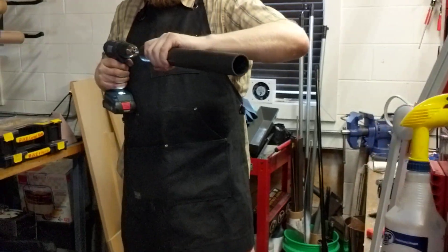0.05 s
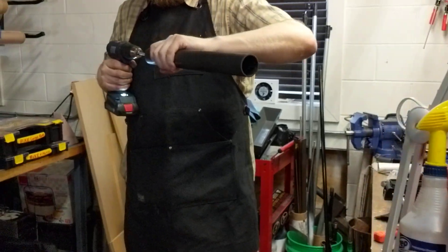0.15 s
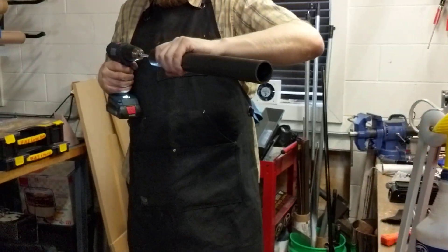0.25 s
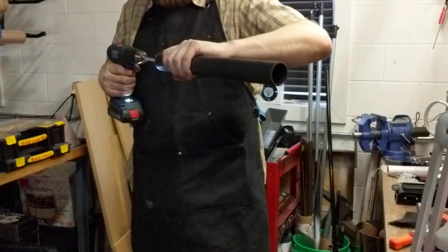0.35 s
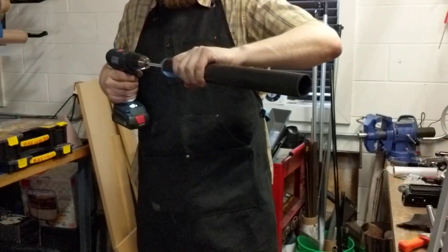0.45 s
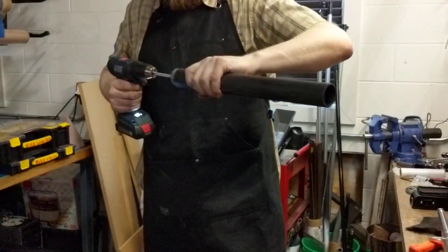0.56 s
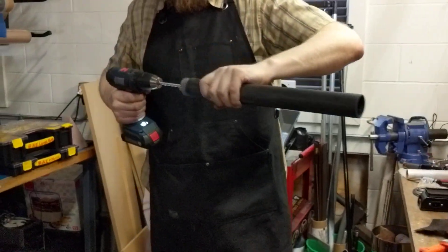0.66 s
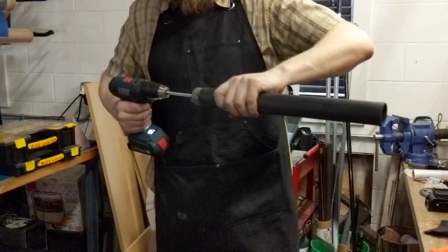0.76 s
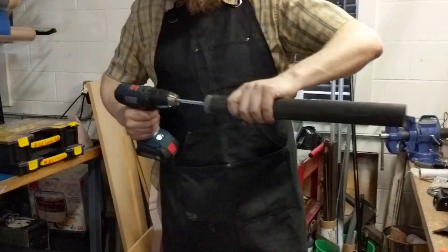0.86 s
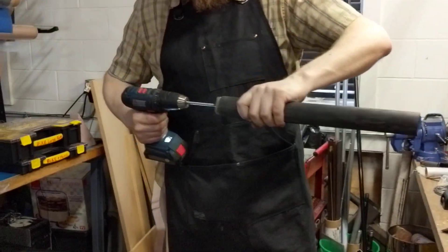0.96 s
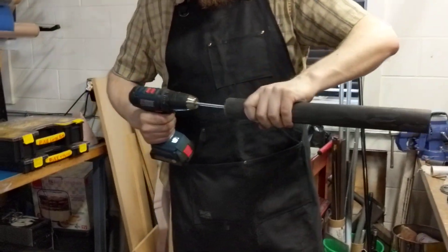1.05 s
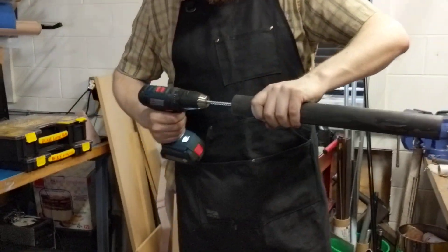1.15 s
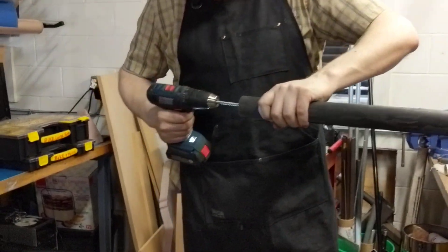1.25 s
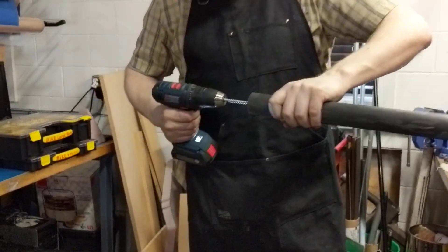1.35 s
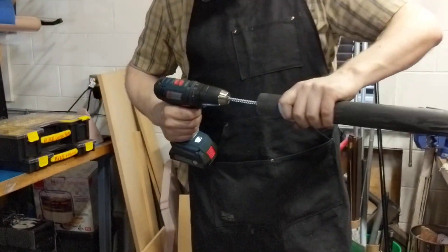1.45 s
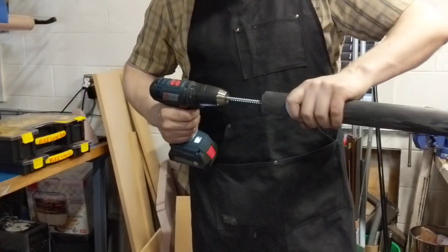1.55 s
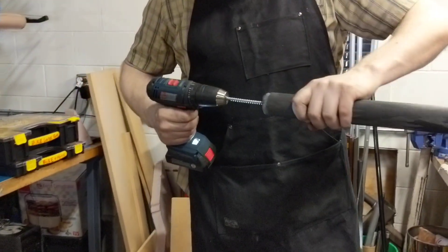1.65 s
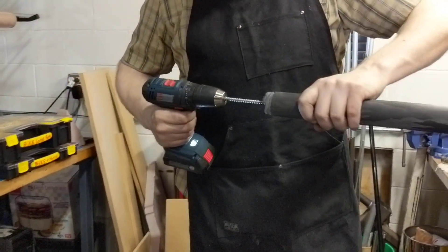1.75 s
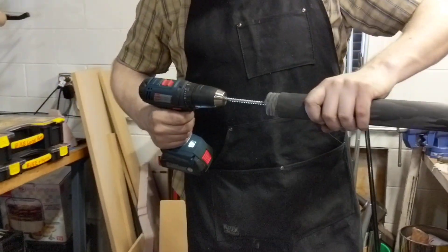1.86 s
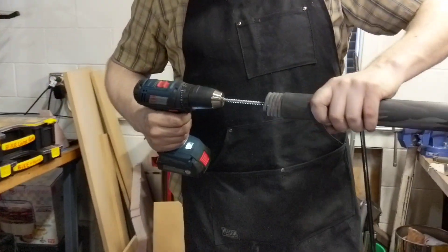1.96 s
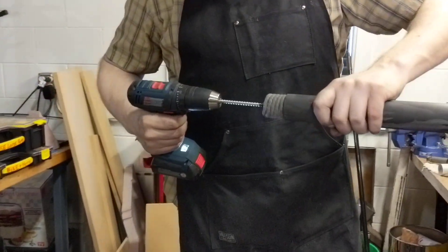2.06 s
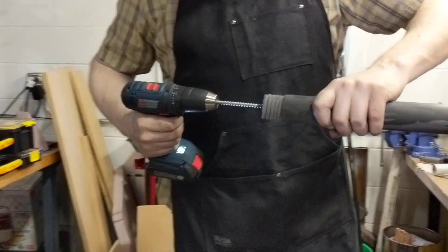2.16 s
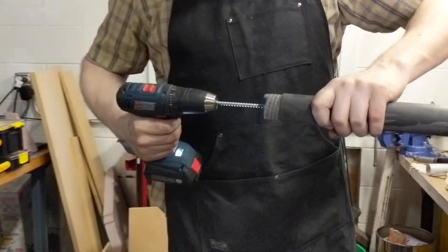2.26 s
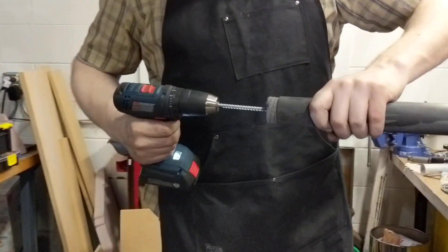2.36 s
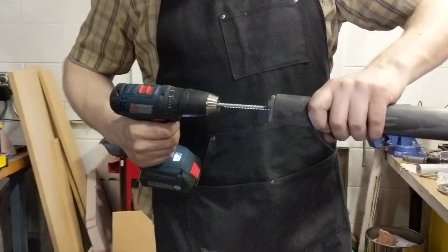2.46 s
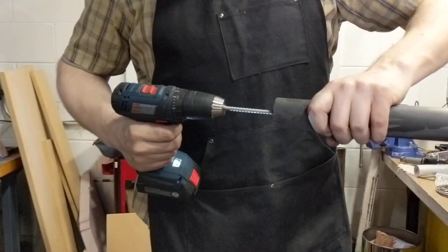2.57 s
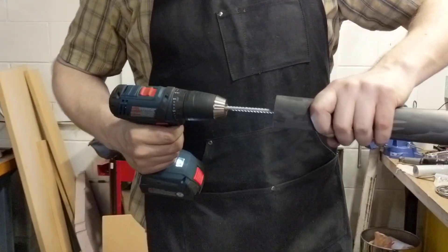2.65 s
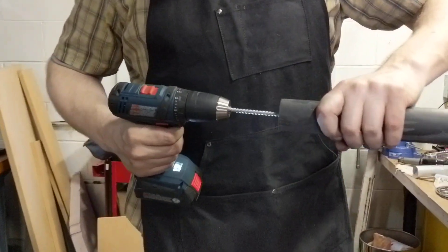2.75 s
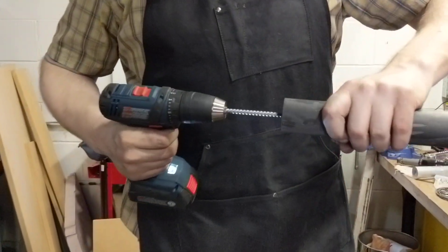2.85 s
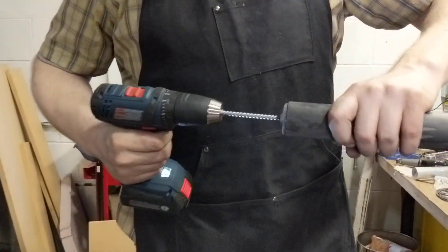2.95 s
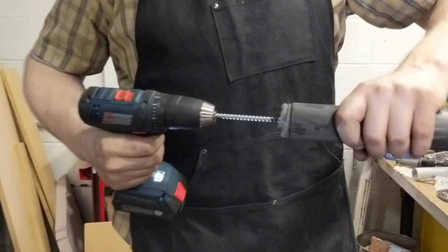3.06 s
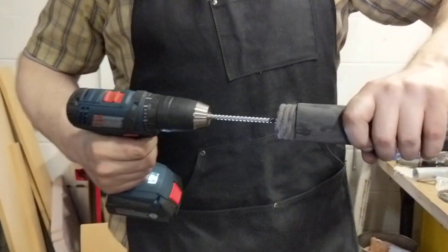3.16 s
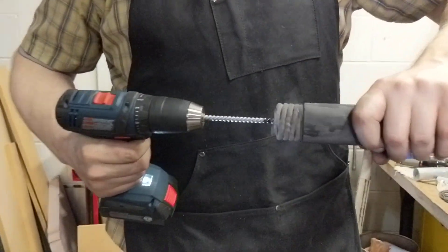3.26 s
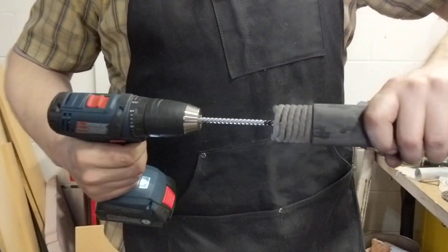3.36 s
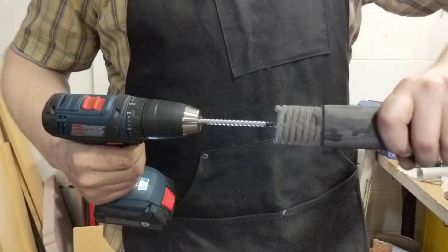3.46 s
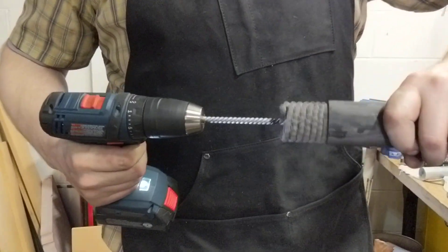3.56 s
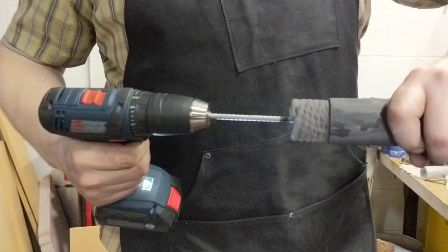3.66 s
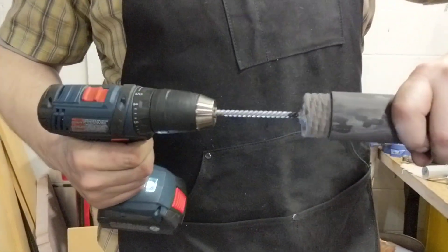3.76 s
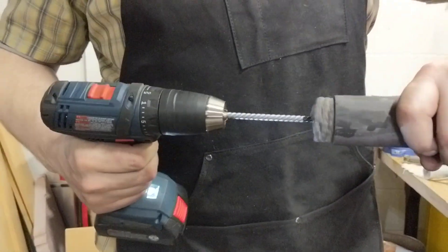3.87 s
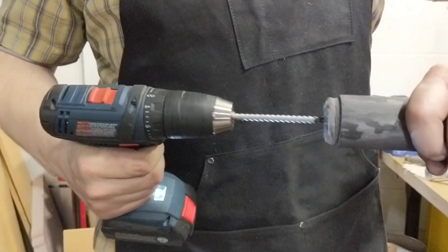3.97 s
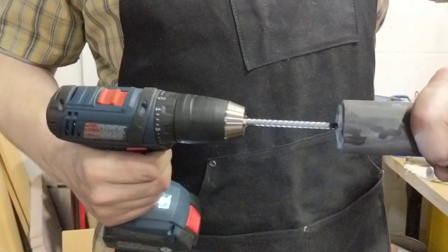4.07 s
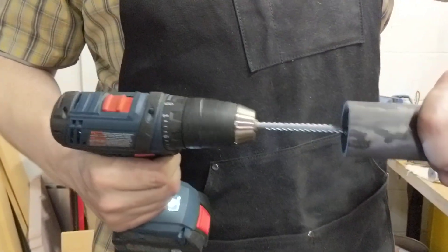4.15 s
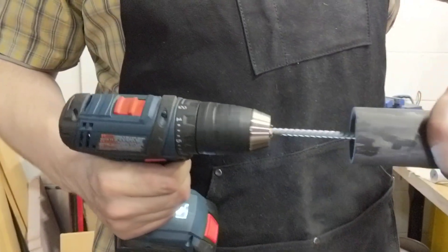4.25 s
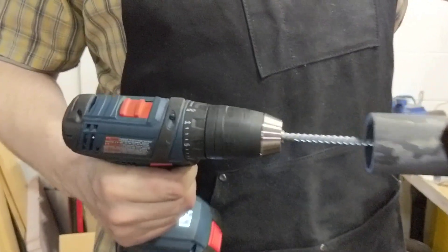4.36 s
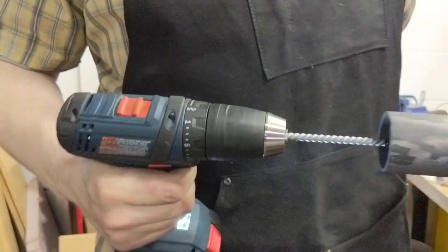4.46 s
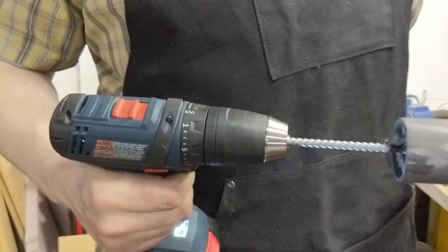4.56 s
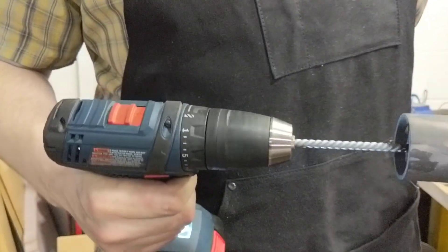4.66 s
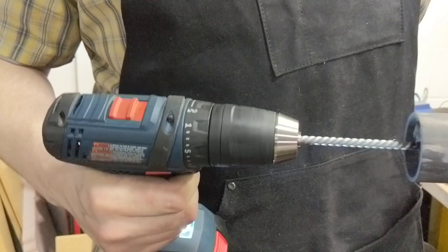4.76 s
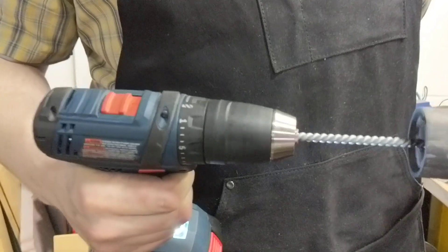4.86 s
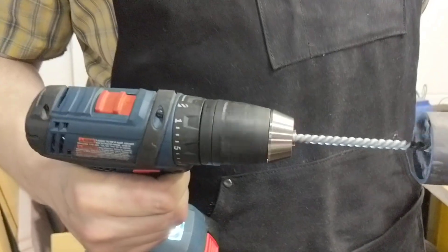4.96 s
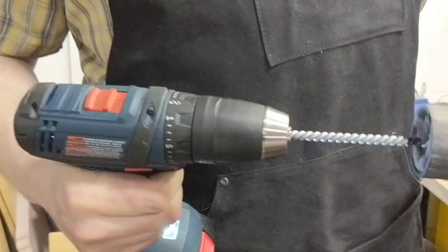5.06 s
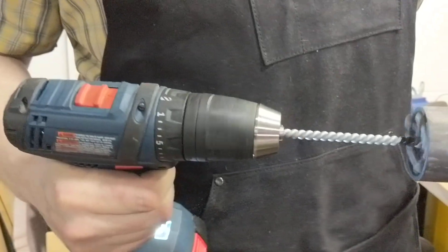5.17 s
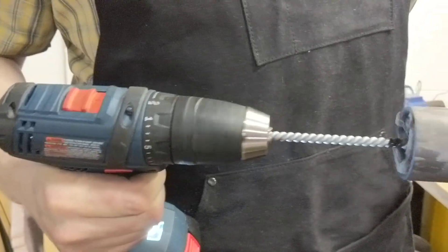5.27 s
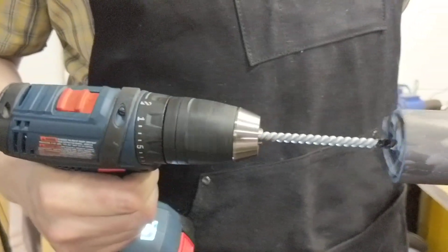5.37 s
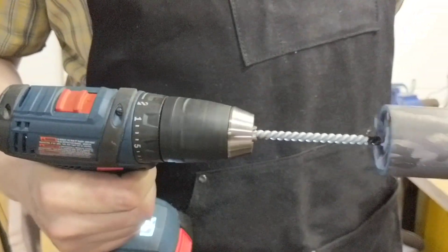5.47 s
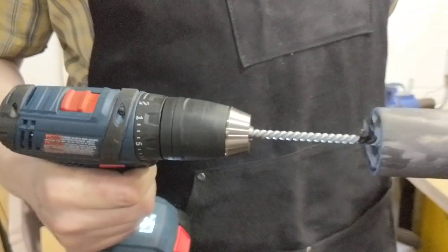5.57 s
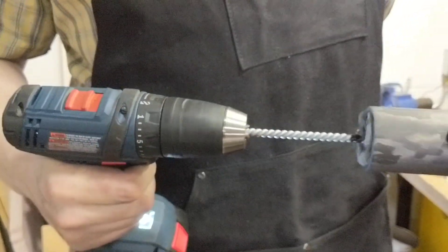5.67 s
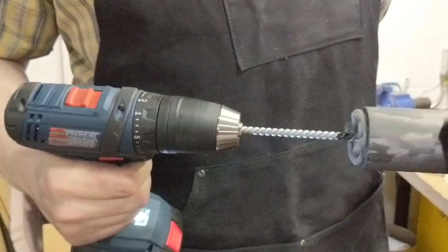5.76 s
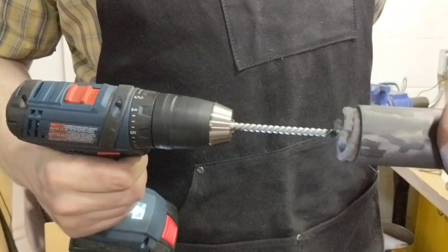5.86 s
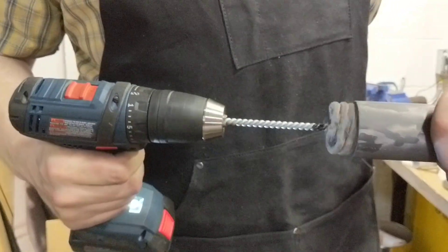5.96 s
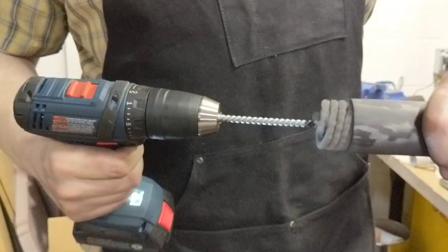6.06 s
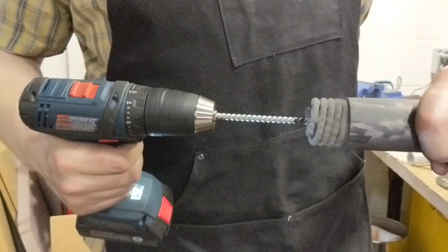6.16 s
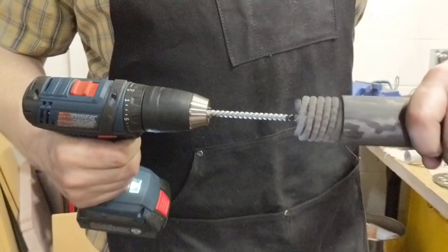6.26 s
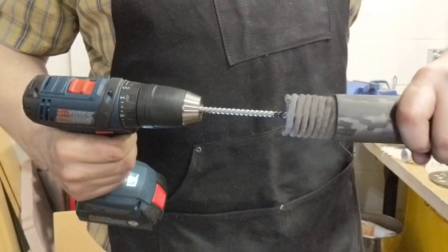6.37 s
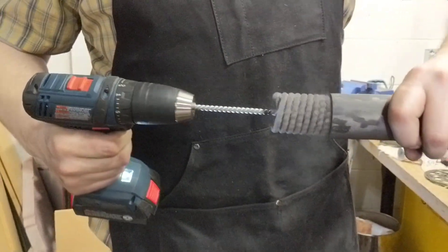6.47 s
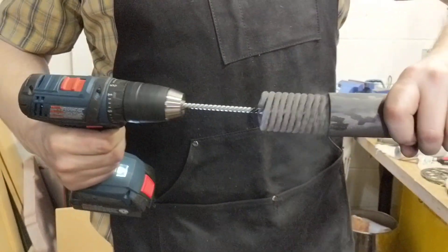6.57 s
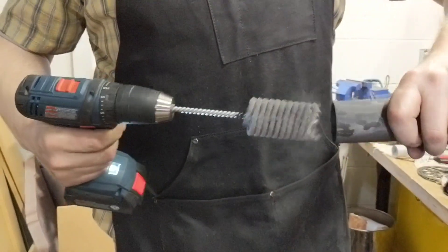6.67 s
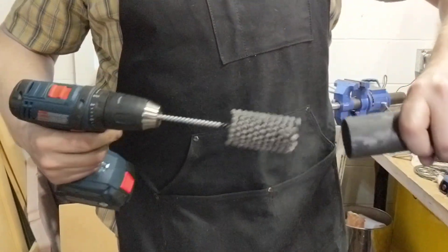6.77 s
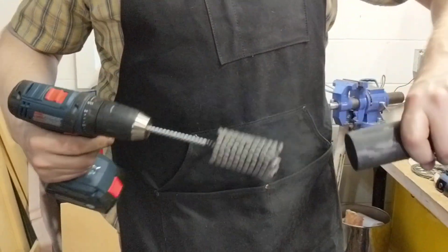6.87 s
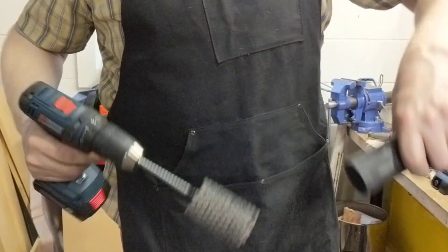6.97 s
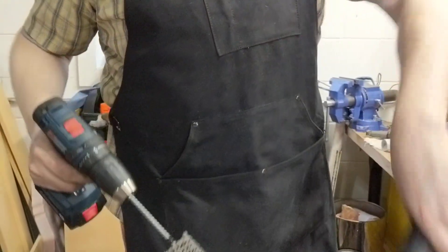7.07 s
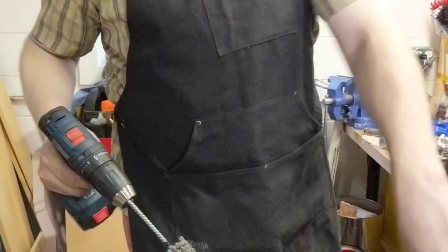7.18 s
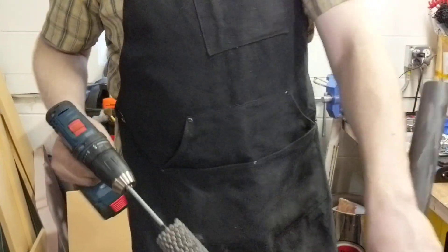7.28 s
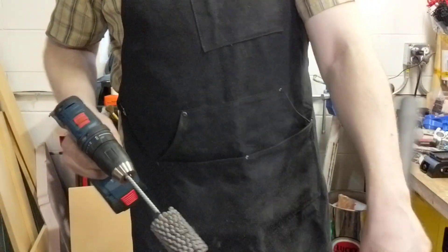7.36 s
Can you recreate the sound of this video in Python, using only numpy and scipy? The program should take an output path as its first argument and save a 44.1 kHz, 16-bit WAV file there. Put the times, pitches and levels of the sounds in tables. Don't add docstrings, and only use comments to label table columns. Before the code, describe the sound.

In a small workshop, a cordless drill runs continuously, its gears whining and wavering as load changes, while abrasive balls scrape the inside of a hand-held tube with bright, grainy hiss. The close microphone moves nearer, making it harsher. Near the end the scrape thins, ticks slow under the brake, a tiny hollow pop sounds, and soft room hum rises.

```python
import sys
import numpy as np
from scipy import signal
from scipy.fft import rfft, irfft, next_fast_len
from scipy.io import wavfile
from scipy.ndimage import uniform_filter1d, map_coordinates

SR = 44100
rng = np.random.default_rng(int(sys.argv[2]) if len(sys.argv) > 2 else 0)


def elevation(decibels):
    levels = np.asarray(decibels, float)
    return 10 ** (levels / 20)


def inscribe(sig):
    pcm = np.round(np.clip(np.atleast_2d(sig).T, -1, 1) * 32767)
    wavfile.write(sys.argv[1], SR, pcm.astype(np.int16))


N = 327222
TIME = np.arange(N) / SR
BRAKE_S, STOP_S, POP_S = 6.649, 6.768, 6.756


def unit(x):
    return x / np.sqrt(np.mean(x ** 2) + 1e-20)


def along(points, hz):
    f, v = np.transpose(points)
    return np.interp(np.log(hz + 1), np.log(f + 1), v)


def curves(rows):
    s, *columns = np.transpose(rows)
    return [np.interp(TIME, s, column) for column in columns]


def wobble(rate):
    knots = rng.standard_normal(int(N * rate / SR) + 4)
    return map_coordinates(knots, [TIME * rate])


def filtered(x, response):
    m = next_fast_len(N + SR // 2)
    return irfft(rfft(x, m) * response(np.fft.rfftfreq(m, 1 / SR)), m)[:N]


def rush(spectrum, patchy_db):
    z = signal.stft(rng.standard_normal(N + 512), nperseg=512)[2]
    across_hz = uniform_filter1d(rng.standard_normal(z.shape), 6, 0)
    patches = unit(uniform_filter1d(across_hz, 10, 1))
    noise = signal.istft(z * elevation(patchy_db * patches), nperseg=512)[1][:N]
    return unit(filtered(noise, lambda hz: elevation(along(spectrum, hz))))


# (time [s], spindle speed [Hz], gear mesh [dB], ball pressure [dB], mesh sharpness [dB])
TRAVEL = [(0, 23.16, -2, 0.5, -2), (0.331, 22.46, -2, -0.5, -2.5), (.86, 24.05, -2, -1, -1),
          (1.28, 23.78, 0, -0.5, 1), (1.62, 22.29, 1, -0.5, 0), (2.23, 25.04, -5, -2.5, -3),
          (2.68, 23.41, -1, 0, -5), (3.05, 21.87, -1, 0.5, 2.5), (3.57, 25.42, -8.5, -3, -1),
          (4.1, 23.63, -6, 0.5, 2), (4.32, 23.43, 0.5, 0, 1), (4.6, 21.9, 1, 0.5, -1),
          (4.78, 22.18, -1, 0.5, 0), (5.2, 21.09, 2, 0.5, -1), (5.5, 21.37, 0, 0, 0),
          (5.96, 20.87, 0, -1.5, 1), (6.36, 24.09, -11.5, -2, -5.5), (6.771, 25.7, -25, -5.5, -3)]


def spindle():
    s, hz = np.transpose(TRAVEL)[:2]
    place = np.interp(TIME, s, np.arange(len(s)))
    eased = np.floor(place) + np.sin(np.pi / 2 * (place % 1)) ** 2
    return np.interp(eased, np.arange(len(s)), hz)


def running(fall_s):
    return np.exp(-np.maximum(TIME - STOP_S, 0) / fall_s)


USUAL_HZ = 23
# (time [s], level [dB])
CLOSENESS = [(0, -0.5), (2.2, 1.5), (3, 2), (4, 3.5), (5.2, 3.5), (6, 3), (6.77, 3)]


def law(rule, drive_db):
    db, share, per_hz, near = rule
    sag_hz = USUAL_HZ - spindle()
    return db + share * drive_db + per_hz * sag_hz + near * curves(CLOSENESS)[0]


# (lowest order [per turn], level of each [dB])
MESH_CLUSTERS = [
    (39, [-2.5, -8, -12, -8]),
    (79, [-13, -10, -.5, -11]),
    (119, [-13, -9, -1, -11]),
]
# (level [dB], share of mesh dB [ratio], sag [dB per Hz], share of nearness [ratio])
MESH_LAWS = [(-43, 0.8, -0.06, 0.058), (-39.5, 1.38, 0.35, 0.31), (-43, 0.7, -0.5, 0.71)]
SHARPNESS_SHARES = [-0.32, .05, 1]
SIDEBAND_LEAN = [1.5, .1, -1]
# (order [per turn], level under the third cluster [dB])
FOURTH_CLUSTER = [(156, -12), (158, -10), (160, -9), (161, -9), (163, -10), (165, -12)]
# (order [per turn], level under the second cluster [dB])
STRAY_ORDERS = [(49, -19), (56, -16), (63, -17), (87, -14)]


def whine(turns):
    mesh_db, _, sharp_db = curves(TRAVEL)[1:]
    levels = [law(rule, mesh_db) + share * sharp_db for rule, share in zip(MESH_LAWS, SHARPNESS_SHARES)]
    faster_hz = np.maximum(spindle() - USUAL_HZ, 0)
    shake = 0.3 * wobble(30)

    def tone(order, level, db):
        drift_db = np.minimum(0.8 - 0.25 * db, 2.5) * wobble(5) + 1.2 * wobble(25)
        phase = 2 * np.pi * order * turns + order / 40 * shake + 3 * rng.standard_normal()
        return elevation(level + db + 3 + drift_db) * np.sin(phase)

    sound = np.zeros(N)
    for level, lean_db, (lowest, dbs) in zip(levels, SIDEBAND_LEAN, MESH_CLUSTERS):
        for k, db in enumerate(dbs):
            sound += tone(lowest + k, level + lean_db * faster_hz * (k - 1), db)
    for order, db in FOURTH_CLUSTER:
        sound += tone(order, levels[2], db)
    for order, db in STRAY_ORDERS:
        sound += tone(order, levels[1], db)
    return sound


# (centre [Hz], width [Hz], level
# [dB])
CASING_MODES = [(1370, 1240, -0.5), (3420, 300, -2), (5150, 2800, -3), (8860, 1240, 2.5)]


def casing(blows):
    def response(f):
        total = 0
        for k, (centre, width, db) in enumerate(CASING_MODES):
            damping = 1j * f * width
            total = total + (-1) ** k * elevation(db) * damping / (centre ** 2 - f ** 2 + damping)
        return total
    return filtered(blows, response)


def chatter(blows, push):
    fade = np.exp(-np.arange(200) / 32)
    blunt = signal.fftconvolve(push * np.sqrt(blows), np.hanning(13))[:N]
    ticks = blunt + signal.fftconvolve(blows, fade)[:N] * rng.standard_normal(N)
    return filtered(casing(ticks), lambda hz: (1j * hz / (600 + 1j * hz)) ** 3)


def rattle(turns, level_db):
    at = np.flatnonzero(np.diff(np.floor(7 * turns)))
    late, strength = rng.standard_normal((2, len(at)))
    at = at + np.round(34 * late).astype(int)
    blows = np.zeros(N)
    blows[np.clip(at, 0, N - 1)] = elevation(1.8 * strength)
    return elevation(level_db - 1.5) * unit(chatter(blows, push=1.0)) * (TIME < BRAKE_S)


# (level [dB], share of pressure dB [ratio], sag [dB per Hz], share of nearness [ratio])
TUBE_BOOM_LAW = (-50.5, 1.5, 0.35, .5)
BALL_SCRAPE_LAW = (-29.5, 1.29, -0.01, 0.71)
TUBE_RING_LAW = (-44.5, .3, 0.6, 2.5)
MOTOR_HISS_LAW = (-32.5, 0.88, 0.07, 1.38)
BACKLASH_LAW = (-39.5, -1, 0, 0.33)
EXIT_FADES = [47, 13.6, 65, 31, 5]


def efforts():
    press_db = curves(TRAVEL)[2]
    leaving_s = np.maximum(TIME - 6.51, 0)
    rules = (TUBE_BOOM_LAW, BALL_SCRAPE_LAW, TUBE_RING_LAW, MOTOR_HISS_LAW, BACKLASH_LAW)
    return [law(rule, press_db) - fade * leaving_s for rule, fade in zip(rules, EXIT_FADES)]


# (frequency [Hz], level [dB per Hz])
BOOM_SPECTRUM = [(200, -37), (315, -15), (345, -6), (380, -14), (480, -5.5), (600, -0.5), (750, -1.5),
                 (900, -3.5), (1200, -11), (2500, -49)]
# (frequency [Hz], level [dB per Hz])
SCRAPE_SPECTRUM = [(500, -36), (900, -9.5), (1200, -5.5), (1600, 1), (2200, -3.5), (3000, -3), (3600, -2),
                   (4200, -4.5), (4800, -5), (6000, -7), (9000, -30)]
# (frequency [Hz], level [dB per Hz])
RING_SPECTRUM = [(2600, -31), (3200, -16), (3450, 3), (3650, -1.5), (3900, -9.5), (5000, -49)]
# (frequency [Hz], level [dB per Hz])
HISS_SPECTRUM = [(2650, -42), (4500, -18), (4760, -7.5), (5800, -9.5), (7140, -6), (8660, 3), (9070, -0.5),
                 (10400, -17), (13400, -31.5), (15600, -57)]


def hone(turns):
    boom_db, scrape_db, ring_db, hiss_db, rattle_db = efforts()
    throb = np.sin(2 * np.pi * turns)

    def gritty(noise):
        return unit(elevation(0.91 * wobble(300)) * noise)

    boom = elevation(boom_db + 2.6 * throb) * rush(BOOM_SPECTRUM, patchy_db=1.0)
    scrape = elevation(scrape_db - 2.5 + 0.39 * throb) * gritty(rush(SCRAPE_SPECTRUM, patchy_db=0.48))
    ring = elevation(ring_db - 2.0 + 0.6 * throb) * rush(RING_SPECTRUM, patchy_db=2.0)
    hiss = elevation(hiss_db + 0.42 + 0.47 * throb) * gritty(rush(HISS_SPECTRUM, patchy_db=0.86))
    return boom + scrape + ring + hiss + rattle(turns, rattle_db)


# (frequency [Hz], t60 [s])
ROOM_DECAY = [(300, 0.37), (2000, 0.4), (8000, 0.48), (14000, 0.22)]


def shop(x):
    hz, t, z = signal.stft(rng.standard_normal(SR // 2), SR, nperseg=256)
    decay_db = -60 * t / along(ROOM_DECAY, hz)[:, None]
    tail = signal.istft(z * elevation(decay_db), SR, nperseg=256)[1]
    delayed = np.pad(x, (300, 0))
    return signal.fftconvolve(delayed, tail / np.linalg.norm(tail))[:N]


# (frequency [Hz], level [dB per Hz])
HUM_SPECTRUM = [(30, -10), (53, -5), (120, -4.5), (145, -7.5), (185, -5), (300, -11), (400, -9.5),
                (700, -16.5), (1300, -19.5), (2500, -26), (6000, -31.5), (8500, -30), (10500, -44),
                (15700, -50)]


def hum(loud):
    power = signal.lfilter([1 / 900], [1, 1 / 900 - 1], loud ** 2, zi=[0.002])[0]
    duck_db = 0.67 * np.maximum(10 * np.log10(power + 1e-9) + 36, 0)
    duck_db = uniform_filter1d(duck_db, size=2600, origin=1250)
    swell_db = 0.6 * wobble(9)
    return elevation(-55.0 - duck_db + swell_db) * rush(HUM_SPECTRUM, patchy_db=0.5)


# (time [s], level [dB])
HANDLING_LEVEL = [(0, -64), (2.1, -64), (2.7, -76), (4, -85), (6.4, -77)]
# (frequency [Hz], level [dB per Hz])
RUMBLE_SPECTRUM = [(15, -46), (35, -11.5), (55, 3), (80, -10), (130, -21), (300, -63.5)]


def handling():
    level_db = curves(HANDLING_LEVEL)[0] - 1.0 + 3 * wobble(9.4)
    return elevation(level_db) * rush(RUMBLE_SPECTRUM, patchy_db=-1.0)


def brake_ticks():
    k = np.arange(26)
    when_s = BRAKE_S + 0.00538 * k + 9e-7 * k ** 3 + 1e-19 * k ** 12.
    uneven_db = 1.8 * rng.standard_normal(len(k))
    dying_db = 5 * np.maximum(k - 22, 0)
    blows = np.zeros(N)
    blows[np.round(when_s * SR).astype(int)] = elevation(-26.5 + uneven_db - dying_db + 7)
    return chatter(blows, push=0.42)


# (first pitch [Hz], last pitch [Hz], level [dB], t60 [s])
TUBE_POP = (870, 680, -34, .045)


def tube_pop():
    first_hz, last_hz, db, t60 = TUBE_POP
    age = np.maximum(TIME - POP_S, 0)
    hz = last_hz + (first_hz - last_hz) * np.exp(-age / 0.02)
    swell = np.minimum(age / 0.01, 1) ** 2
    return elevation(db + 12 - 60 * age / t60) * swell * np.sin(2 * np.pi * np.cumsum(hz) / SR)


def scene():
    turns = np.cumsum(spindle()) / SR
    drill = running(fall_s=0.025) * (whine(turns) + hone(turns)) + brake_ticks() + tube_pop()
    heard = elevation(0.91) * drill + elevation(-12) * shop(drill)
    return np.tile(heard + hum(heard) + handling(), (2, 1))


def roll_off(x):
    return signal.sosfilt(signal.butter(12, 15720, fs=SR, output="sos"), x)


def record(dry):
    def response(hz):
        return (hz < 15720) * hz ** 4 / (hz ** 4 + 42 ** 4)
    mix = np.array([filtered(side, response) for side in dry])
    return roll_off(mix)


dry = scene()
out = record(dry)
inscribe(out)
```